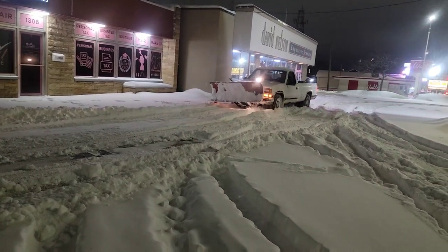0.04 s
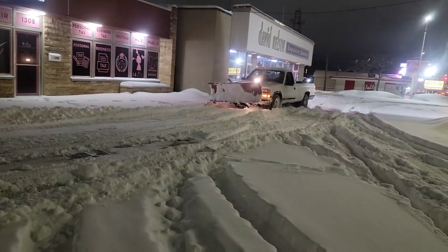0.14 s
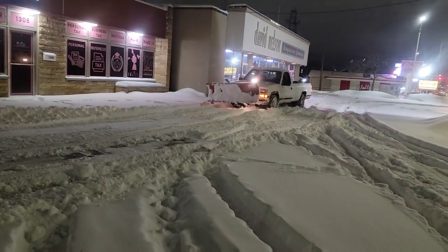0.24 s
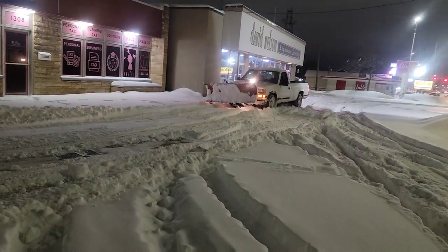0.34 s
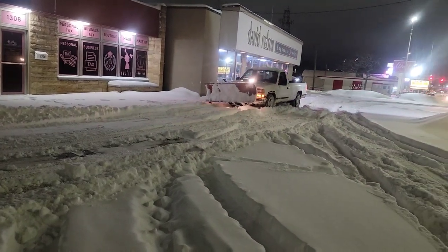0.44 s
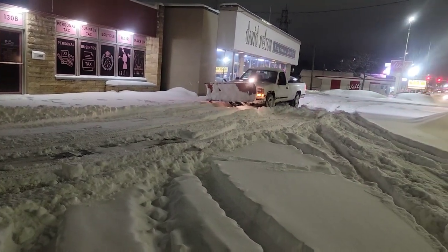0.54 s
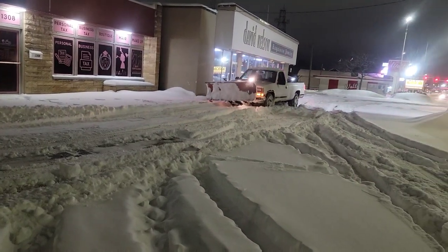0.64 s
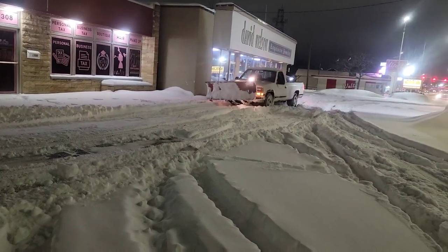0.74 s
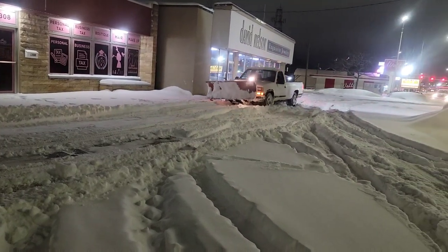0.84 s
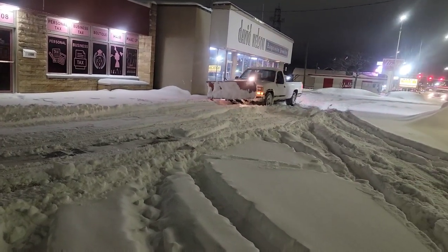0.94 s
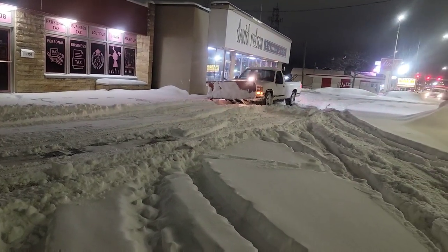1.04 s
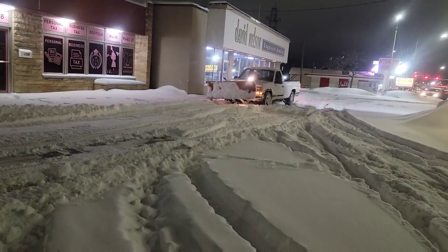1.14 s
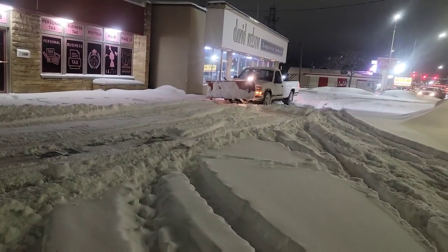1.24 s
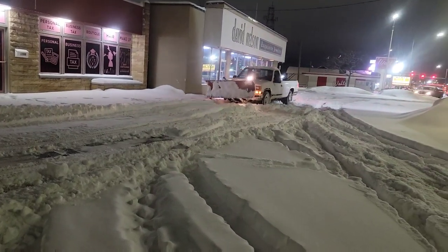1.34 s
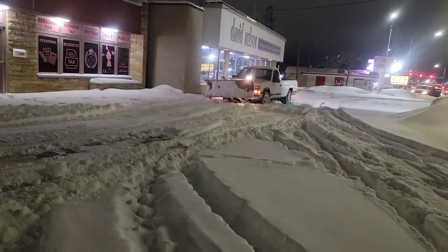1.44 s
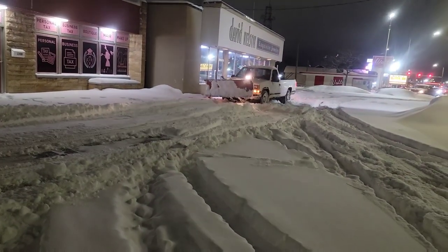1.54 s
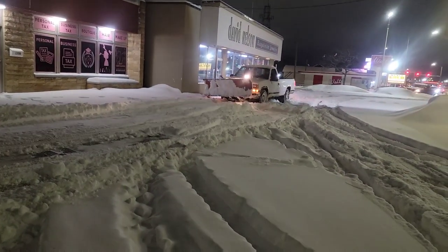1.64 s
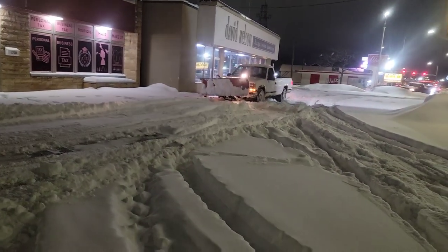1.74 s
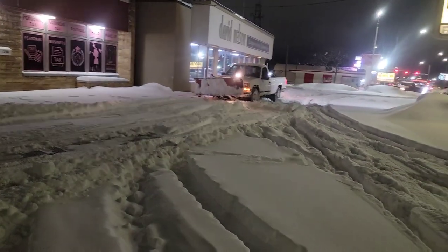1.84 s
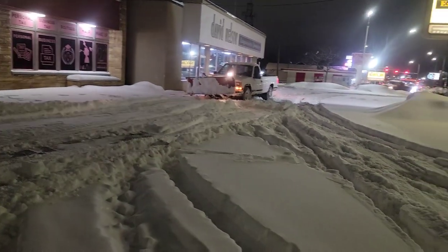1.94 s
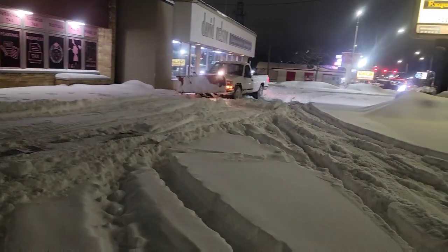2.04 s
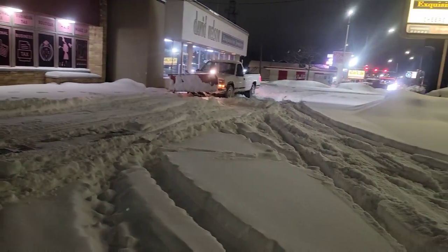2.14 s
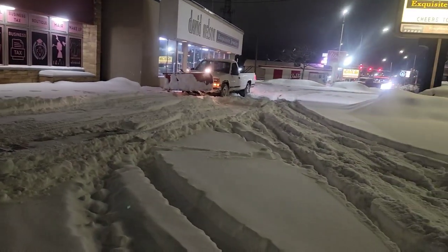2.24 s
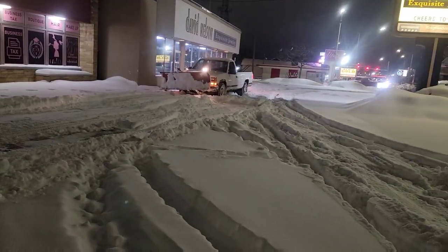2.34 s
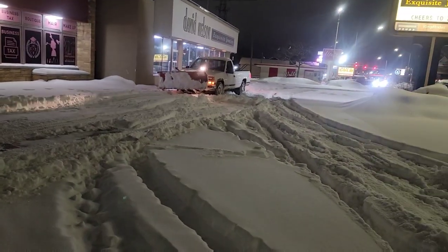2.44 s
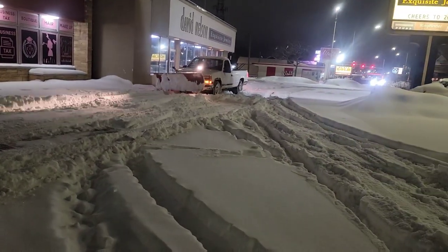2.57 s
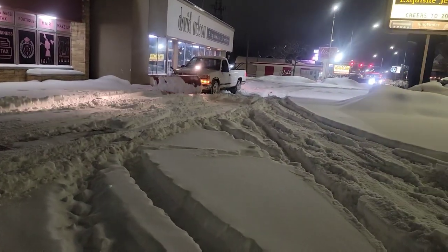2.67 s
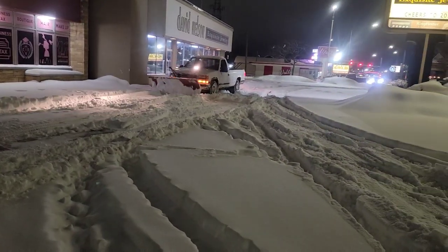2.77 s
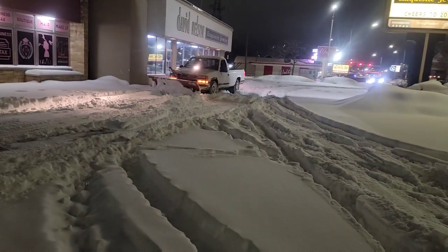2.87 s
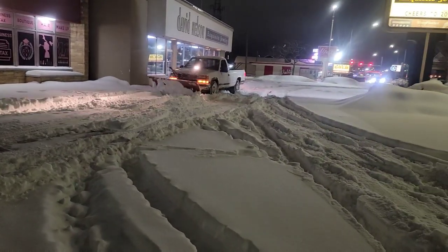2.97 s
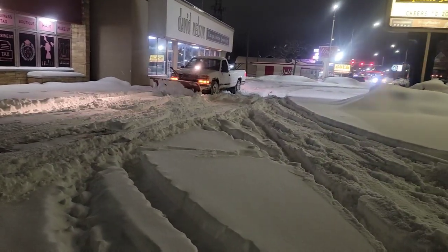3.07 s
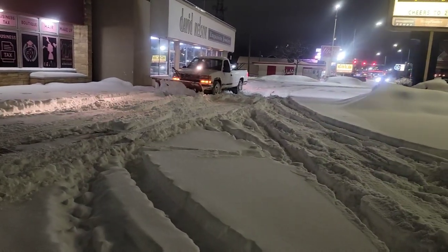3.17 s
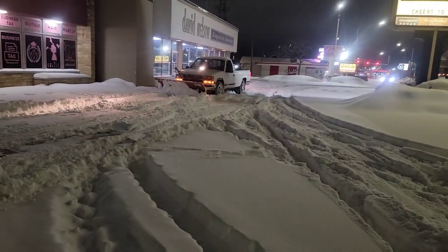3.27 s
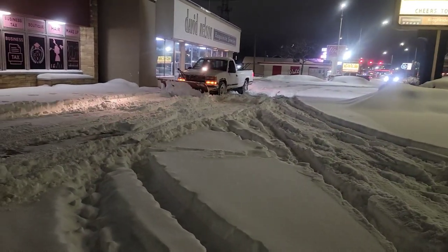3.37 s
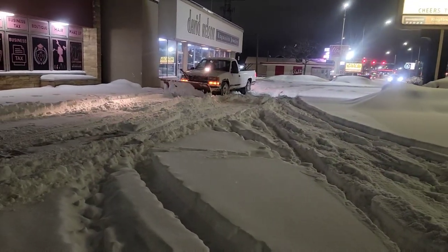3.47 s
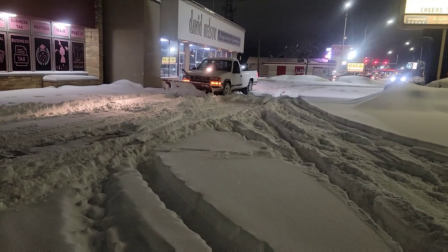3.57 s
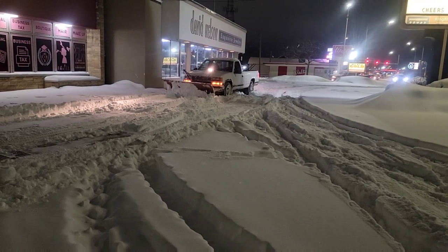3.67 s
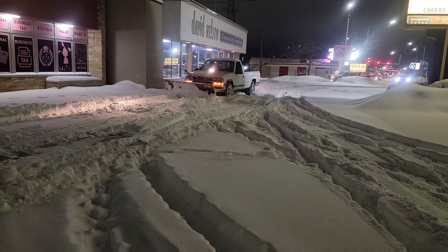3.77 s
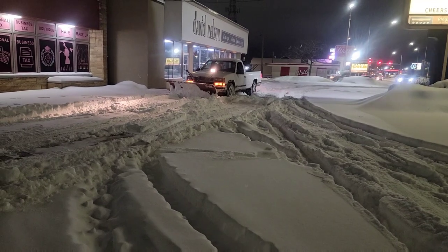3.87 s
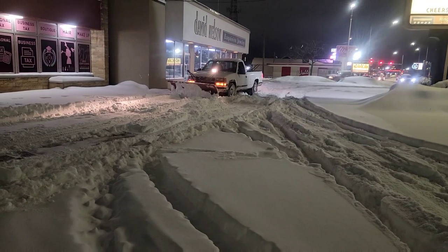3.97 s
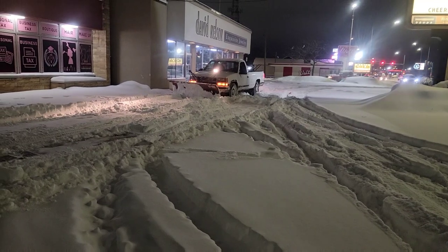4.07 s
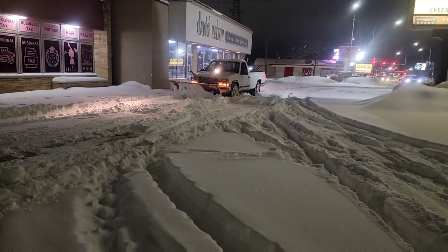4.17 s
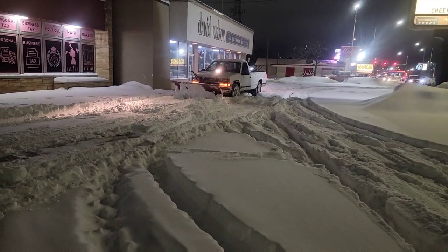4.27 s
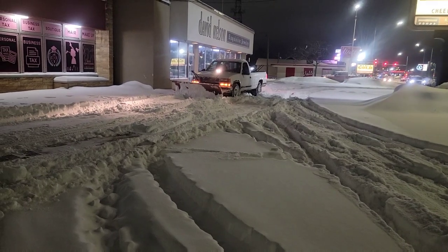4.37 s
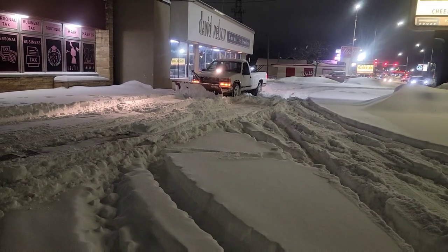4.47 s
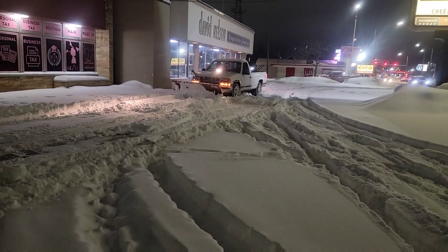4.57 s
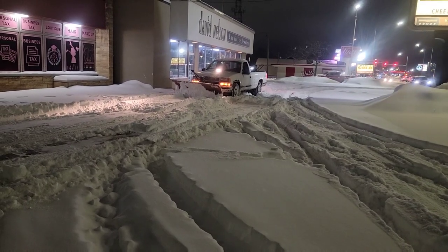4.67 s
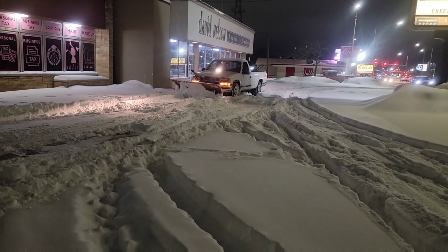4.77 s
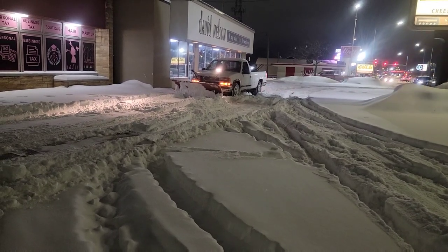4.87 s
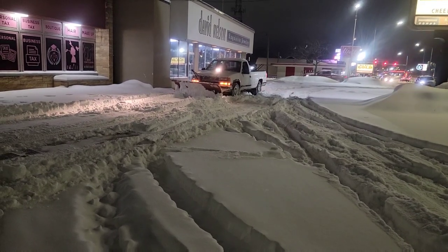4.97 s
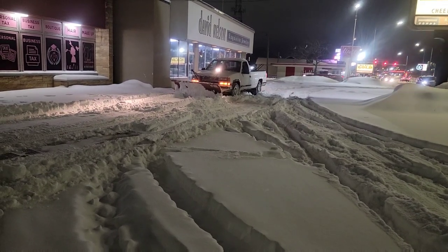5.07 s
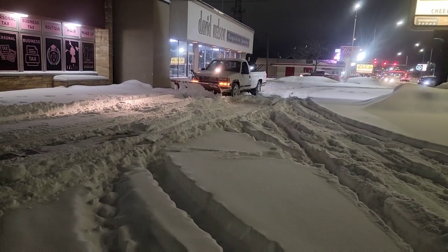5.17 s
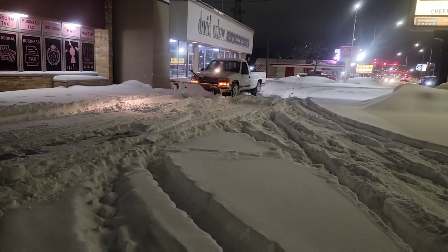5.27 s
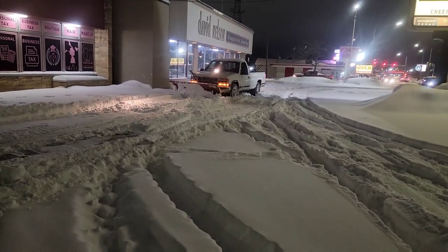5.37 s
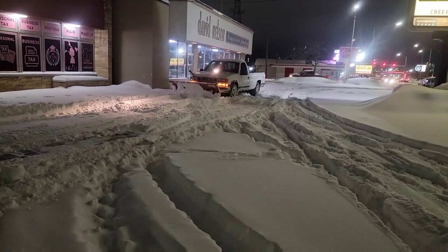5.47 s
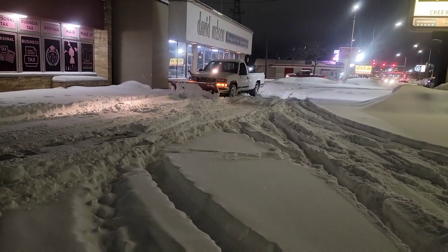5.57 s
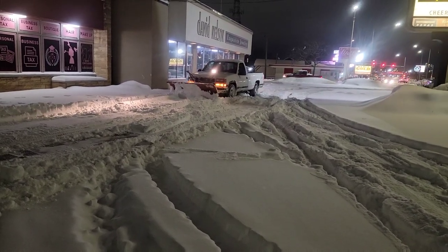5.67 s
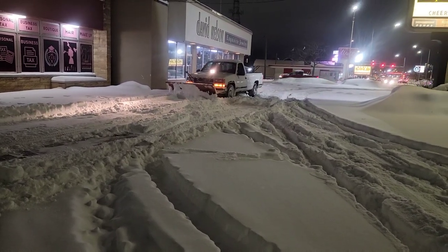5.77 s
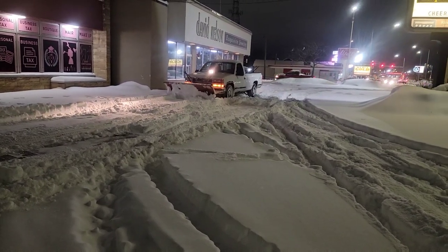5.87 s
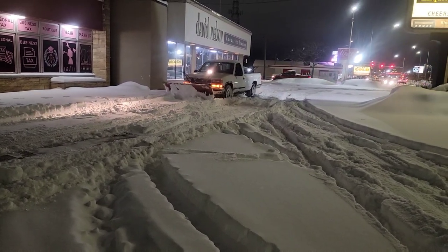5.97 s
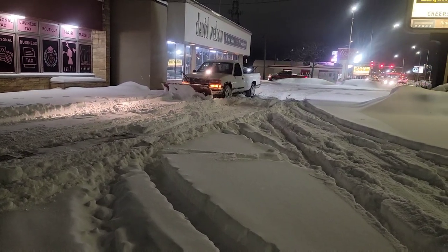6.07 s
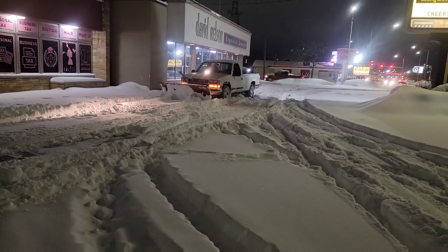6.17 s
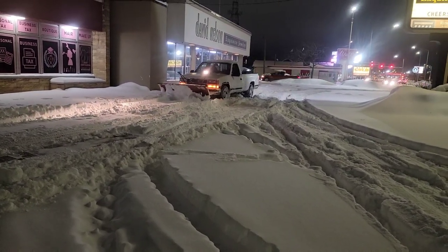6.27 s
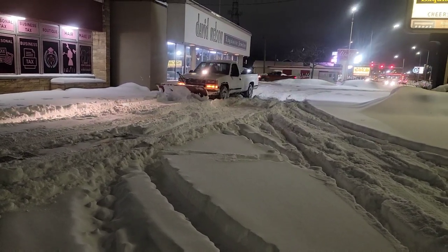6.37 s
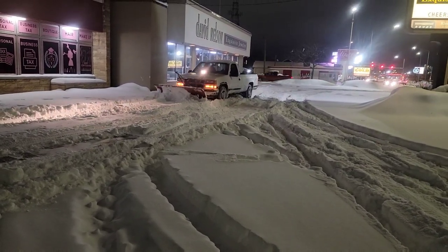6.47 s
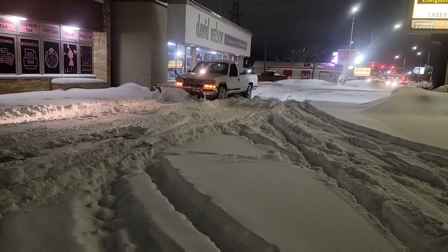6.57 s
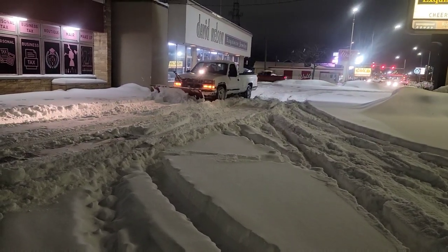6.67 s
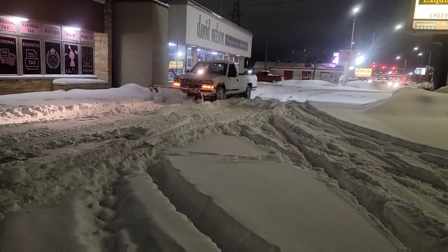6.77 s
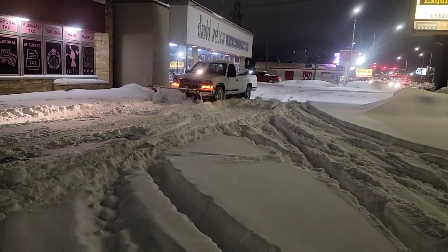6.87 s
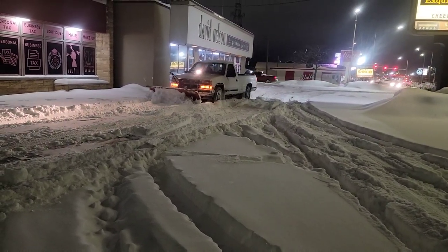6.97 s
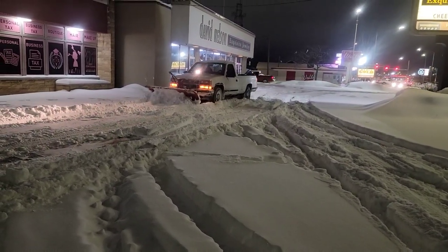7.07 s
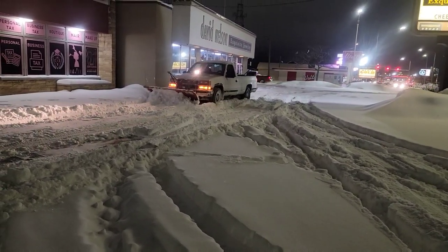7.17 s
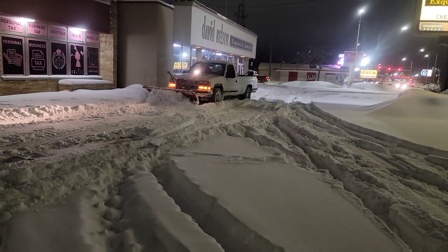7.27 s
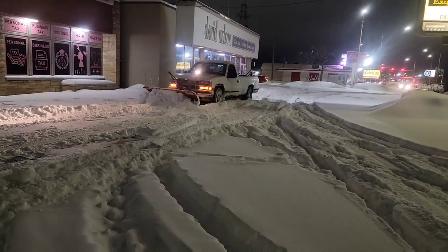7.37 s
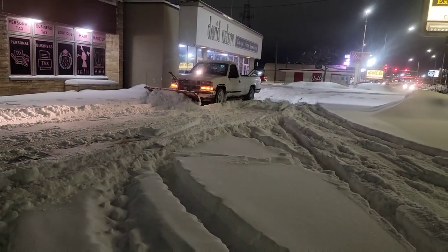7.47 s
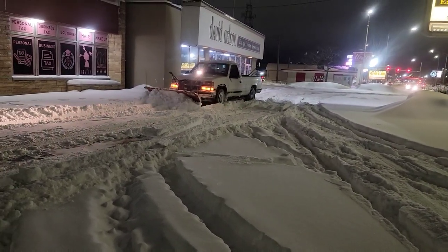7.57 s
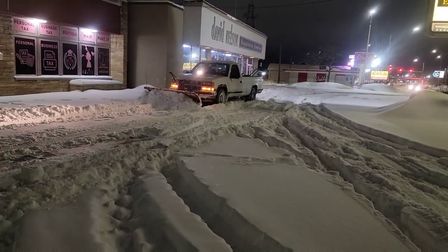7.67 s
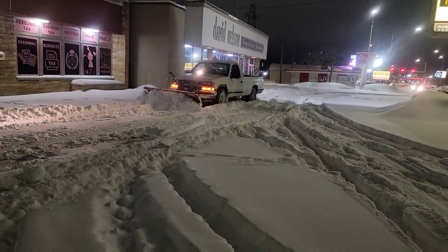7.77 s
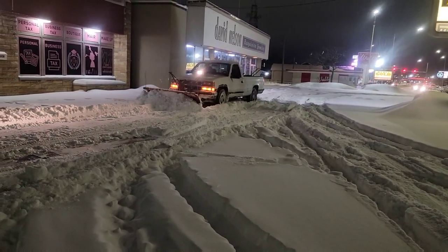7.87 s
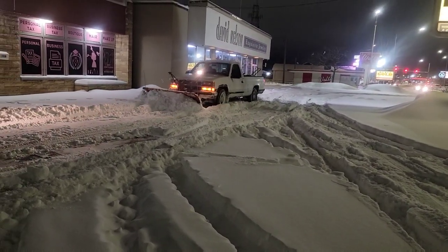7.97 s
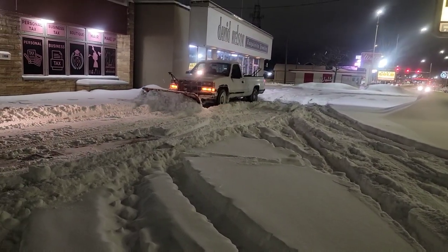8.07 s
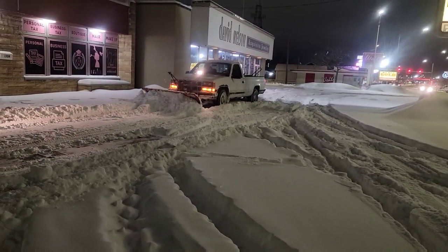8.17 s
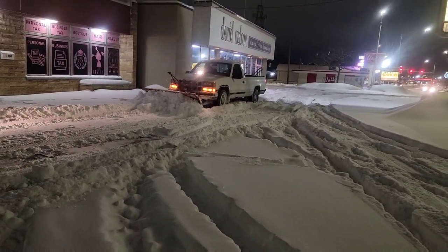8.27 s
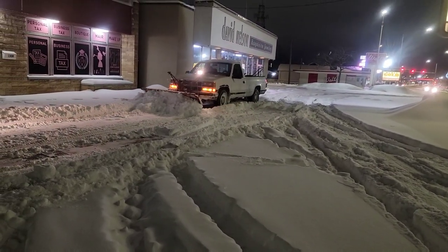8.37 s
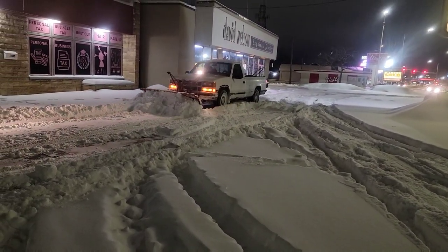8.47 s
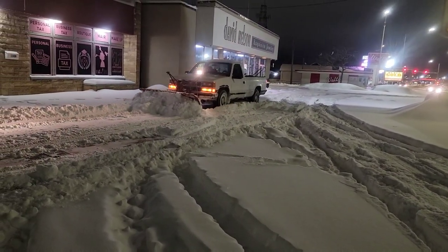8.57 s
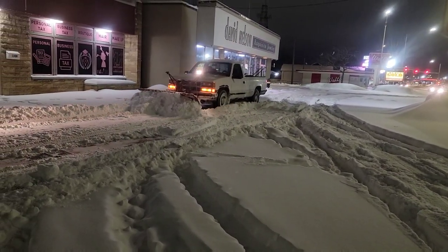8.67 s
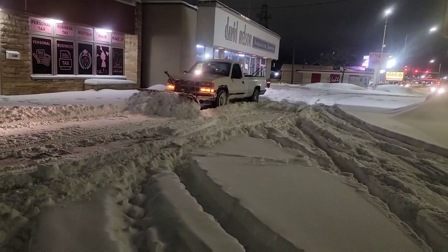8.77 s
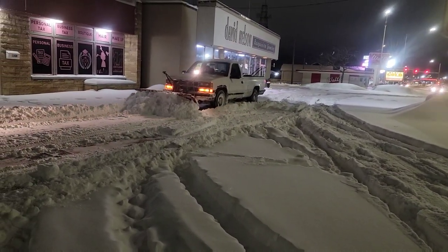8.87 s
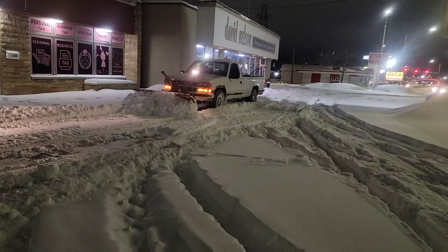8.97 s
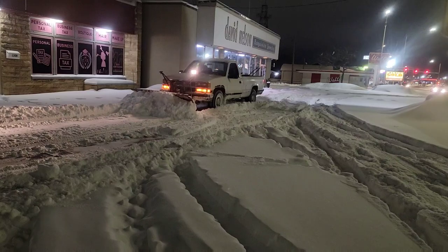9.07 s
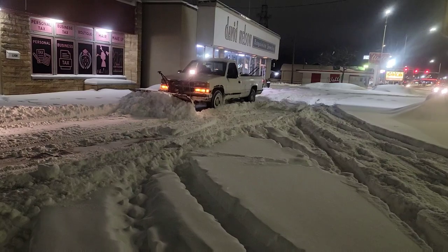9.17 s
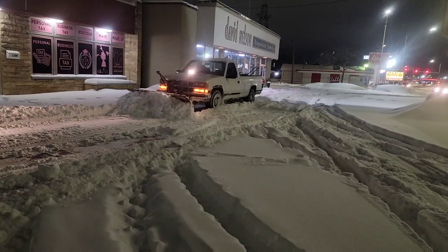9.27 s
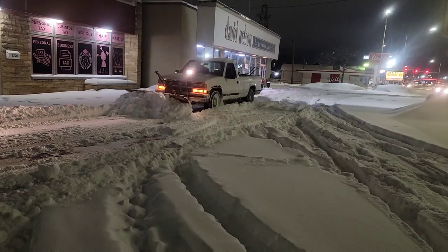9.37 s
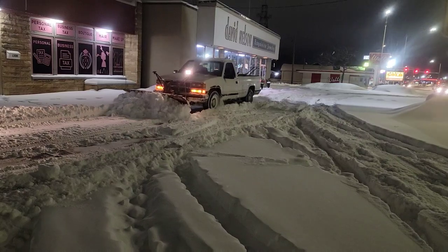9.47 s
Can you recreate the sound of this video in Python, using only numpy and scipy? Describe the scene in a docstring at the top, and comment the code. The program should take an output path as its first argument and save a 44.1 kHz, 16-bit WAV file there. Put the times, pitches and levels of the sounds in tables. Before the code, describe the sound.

Snowy parking lot beside a wet road, heard in wide outdoor stereo. Tyres roar and swish through slush to the right, while a deep truck exhaust burbles down to a quiet idle. A faint machine hum wavers midway. Then the engine pulls, roars and barks closer, dipping between surges, and snow grinds with fine cracks and faint squeaks to the end.

```python
"""A snowy parking lot at night, beside a slushy road: a V8 pickup plows snow.
The engine, built from cycle orders and firing pulses, blips, drops to a lumpy idle, takes up gear and revs.
A broad rush from the idling truck swells and sinks, then the blade scrapes the snow, as shaped noise
and cracks, with squeaks; a faint machine hum wavers. Cars hiss past on the road to the right, as patchy
noise; two close microphone ports hear it all, spread wide."""
import sys
import numpy as np
from scipy import signal
from scipy.fft import rfft, irfft
from scipy.io import wavfile
from scipy.ndimage import uniform_filter1d

SR = 44100
rng = np.random.default_rng(int(sys.argv[2]) if len(sys.argv) > 2 else 0)


def persist_wave(psi):
    """Save psi, clipped to +-1, as 16-bit WAV."""
    counts = np.round(np.clip(psi, -1, 1) * 32767).astype(np.int16)
    wavfile.write(sys.argv[1], SR, np.atleast_2d(counts).T)


N = 420273
TIME = np.arange(N) / SR
BINS = np.fft.rfftfreq(N, 1 / SR)
# short noise frames, 1024 samples long and 256 apart
FRAME_S = np.arange(N // 256 + 5)[:, None] * 256 / SR
FRAME_HZ = np.fft.rfftfreq(1024, 1 / SR)

TRUCK_LAG_MS = -0.13  # lag of the left port; below zero the left port hears the truck first
# working effort and firing rate, at which the engine levels are set
WORK_EFFORT_DB, WORK_HZ = -14, 150

# Strength of each cylinder's pulse at the tailpipe, in firing order; one barks above the rest.
# Each entry: strength in dB.
CYLINDER_DB = [-3, -0.5, -1.5, -3, 2.5, 0, 1, -2]
# Patches of slush under the tyres. Each row: centre in seconds, half length in seconds,
# added roar in dB, added hiss in dB, added spray in dB, swish level in dB.
SLUSH_PATCHES = [(.15, 0.48, 2, -5.5, -2, -39.5), (.75, 0.34, 1, 3, 1.5, -42.5),
                 (2.47, 0.18, 0, 3, -4, -41.5), (3.63, 0.078, -1, -0.5, 3, -60),
                 (5.1, 0.54, -1.5, 3, 2.5, -31.5), (5.53, 0.11, 2.5, 4, -3, -32.5),
                 (6.27, 0.48, -1.5, 1, -0.5, -36), (8.4, 0.41, 0, 4, 5.5, -61)]


def amp(db):
    """Decibels to gain."""
    return 10 ** (np.asarray(db) / 20)


def evened(x):
    """Scales to rms 1."""
    return x / np.sqrt(np.mean(abs(x) ** 2) + 1e-20)


def curve(rows, t=TIME, order=1):
    """One column of a table, joined by straight lines in time."""
    columns = np.transpose(rows)
    return np.interp(t, columns[0], columns[order])


def read(points, hz):
    """A spectrum, joined by straight lines over log frequency."""
    f, value = np.transpose(points)
    return np.interp(np.log(hz + 1), np.log(f + 1), value)


def colour(x, points):
    """Causal filter with the given spectrum, output at rms 1."""
    log_gain = np.log(amp(read(points, abs(np.fft.fftfreq(N, 1 / SR)))))
    # the Hilbert transform gives the phase of the causal (minimum-phase) filter
    response = np.exp(np.conj(signal.hilbert(log_gain)))[:len(BINS)]
    return evened(irfft(rfft(x) * response, N))


def wander(hz):
    """Slow chance of rms 1."""
    return evened(irfft(rfft(rng.standard_normal(N)) / (1 + (BINS / hz) ** 4), N))


def drift(per_s):
    """Random values joined by straight lines."""
    knots_s = np.arange(0, TIME[-1], 1 / per_s)
    return np.interp(TIME, knots_s, rng.standard_normal(len(knots_s)))


def swells(rows, order=2):
    """Sum of bell-shaped rises, one for each row (s, half length s, heights)."""
    return sum(row[order] * np.exp(-abs((TIME - row[0]) / row[1]) ** 2.6) for row in rows)


def bursts(rows, order=2):
    """Level in dB of bell-shaped bursts, one for each row (s, half length s, levels)."""
    gains = [(row[0], row[1], amp(row[order])) for row in rows]
    return 20 * np.log10(swells(gains) + 1e-9)


def band(hz, octaves):
    """A bell over log frequency, 1 at its centre."""
    return np.exp(-(np.log2((FRAME_HZ + 1) / hz) / octaves) ** 2)


def placed(x, lag_ms):
    """A point source reaches the left port later by the lag."""
    left = irfft(rfft(x) * np.exp(-2j * np.pi * BINS * lag_ms / 1000), N)
    return np.array([left, x])


def rush(spectrum, level_db, lag_ms, scattered, patchy_db, shape_db=0):
    """Patchy noise from one bearing, part of it scattered by the walls from all sides."""
    shape = (len(FRAME_S), len(FRAME_HZ))
    direct, common, apart = rng.standard_normal((3, *shape)) + 1j * rng.standard_normal((3, *shape))
    delay = np.exp(-2j * np.pi * FRAME_HZ * lag_ms / 1000)
    # sound from all sides is alike at ports 0.15 m apart only in the bass
    same = np.sinc(2 * FRAME_HZ * .15 / 343)
    diffuse = np.array([common, same * common + np.sqrt(1 - same ** 2) * apart])
    share = np.clip(scattered, .01, .99)
    frames = np.sqrt(1 - share) * np.array([direct * delay, direct]) + np.sqrt(share) * diffuse
    # patches run over some frames and neighbouring frequencies
    patches = uniform_filter1d(rng.standard_normal(shape), size=9, axis=0)
    patches = evened(uniform_filter1d(patches, size=16, axis=1))
    frames = frames * amp(read(spectrum, FRAME_HZ) + shape_db + patchy_db * patches)
    noise = signal.istft(frames, nperseg=1024, noverlap=768, time_axis=-2, freq_axis=-1)[1][:, :N]
    return amp(level_db) * evened(noise)


def grains(per_s, spread_db, decay_s):
    """Sparse tiny cracks of very uneven size, each a decaying puff of noise."""
    sizes = amp(spread_db * np.minimum(rng.exponential(1, N), 5)) * (rng.random(N) < per_s / SR)
    envelope = signal.lfilter([1], [1, -np.exp(-1 / (decay_s * SR))], sizes)
    return envelope * rng.standard_normal(N)


def hum():
    """The first three partials of a wavering machine hum."""
    # Each row: time in seconds, pitch in Hz, level in dB ahead of the partial levels.
    hum_path = [(3.3, 110.1, -63), (4, 112.8, -51), (5.3, 115.9, -55), (5.8, 116.5, -41), (6.4, 115.1, -45),
                (7.3, 112.8, -51)]
    # Each entry: level of a partial in dB, from the first up.
    partial_db = [4, -0.5, -6.5]
    turns = np.cumsum(curve(hum_path) * (1 + .001 * wander(hz=6))) / SR
    tone = sum(amp(db) * np.sin(2 * np.pi * k * turns) for k, db in enumerate(partial_db, 1))
    return placed(np.sqrt(2) * amp(curve(hum_path, order=2)) * tone, lag_ms=0.22)


def road():
    """Passing cars grow and fade with distance: roar, hiss and spray dB, port lag, farness (0-1)."""
    # Each row: time abreast in seconds, tyre roar in dB, wet hiss in dB, fine spray in dB.
    cars = [(.8, -37.5, -40, -51), (5.352, -37.5, -37.5, -50.5), (6.3, -39, -41.5, -53),
            (9.1, -43, -67, -55.5)]
    road_m, car_m_per_s = 14.84, 13.64
    ahead_db = 2.5  # tyres are louder ahead of a car than behind it
    abreast_lag_ms = 0.459  # lag of the left port for a car straight to the right
    abreast_s, *layers_db = np.transpose(cars)[:, :, None]
    ahead_m = car_m_per_s * (abreast_s - TIME)
    distance_m = np.hypot(road_m, ahead_m)
    near = road_m / distance_m
    power = (amp(layers_db) * near * amp(ahead_db * ahead_m / distance_m)) ** 2
    levels_db = [10 * np.log10(layer.sum(0)) + swells(SLUSH_PATCHES, order=2 + k)
                 for k, layer in enumerate(power)]
    # the bearing leans to the car with the strongest spray
    lag_ms = np.average(abreast_lag_ms * near, axis=0, weights=power[-1] ** 2)
    far = 1 - near.max(0)  # of the nearest car
    return *levels_db, np.interp(FRAME_S, TIME, lag_ms), np.interp(FRAME_S, TIME, far)


def traffic():
    """Tyres roar and hiss, swish through slush and fling a spray of drops."""
    # Spectra of tyre roar, wet hiss, thrown slush and fine spray.
    # Each row: frequency in Hz, relative level in dB per Hz.
    roar_spectrum, hiss_spectrum = [(100, -5.5), (200, -2), (330, -0.5), (480, -3), (720, 0.5),
                                    (1050, -1.5), (1500, -7), (2300, -25), (5000, -54)], [(700, -19), (1300, 5), (2000, 0.5), (2700, -1.5),
                                                  (3150, -1.5), (3650, 0.5), (3950, -5), (4700, -9.5),
                                                  (7100, -12), (8200, -43)]
    swish_spectrum, spray_spectrum = [(600, -13.5), (1000, -9), (1500, 1.5), (2000, 3), (2550, 0.5),
                                      (3200, -8.5), (4500, -19), (8000, -26)], [(4000, 3), (7000, 7), (8500, -0.5), (12000, -5),
                                                     (12700, 0), (13400, -7), (15000, -6.5)]
    # One band of the roar stands out, climbing as a car leaves and sinking as the next comes.
    # Each row: time in seconds, centre in Hz, boost in dB.
    tyre_band = [(1.4, 720, -1.5), (2, 940, 7), (2.45, 1170, 5.5), (2.8, 1200, -9), (3.8, 990, 5),
                 (4.5, 680, 2.5)]
    roar_db, hiss_db, spray_db, lag_ms, far = road()
    tyre_db = curve(tyre_band, FRAME_S, order=2) * band(curve(tyre_band, FRAME_S), octaves=.24)
    # the snowy ground swallows the low roar of a distant car
    ground_db = -23.5 * far ** 2 * band(403, octaves=1.05)
    roar = rush(roar_spectrum, roar_db, lag_ms, scattered=0.09, patchy_db=1.1,
                shape_db=tyre_db + ground_db)
    hiss = rush(hiss_spectrum, hiss_db, lag_ms, scattered=0.49, patchy_db=1.5)
    swish_db = bursts(SLUSH_PATCHES, order=5)
    swish = rush(swish_spectrum, swish_db, lag_ms, scattered=0.25, patchy_db=0.7)
    spray = rush(spray_spectrum, spray_db, lag_ms, scattered=0.98, patchy_db=3.0)
    # separate drops at each port
    drops = np.array([colour(grains(per_s=87, spread_db=3.8, decay_s=0.0012), spray_spectrum)
                      for port in range(2)])
    return roar + hiss + swish + spray + amp(spray_db - 7.5) * drops


def plow():
    """Noise and fine cracks carry the idling truck's rush, then the scraping blade; packed snow squeaks."""
    # A broad rush from the idling truck swells and sinks, then the blade scrapes the snow.
    # Each row: time in seconds, level in dB.
    broad_path = [(0, -49), (3.2, -39), (5.3, -52.5), (6.7, -36.5), (9.53, -38.5)]
    # Heaps of snow give way. Each row: centre in seconds, half length in seconds, added scraping in dB.
    shoves = [(7.25, 0.11, 2), (8.0, 0.11, 3), (8.28, 0.22, 4.5), (8.82, 0.15, 5.5), (9.47, 0.3, 5.5)]
    # Packed snow squeaks. Each row: centre in seconds, half length in seconds, level in dB.
    squeaks = [(8.1, 0.22, -43), (9.45, 0.32, -47)]
    # Spectra of the broad noise and the squeak. Each row: frequency in Hz, relative level in dB per Hz.
    broad_spectrum, squeak_spectrum = [(300, -1), (700, 4), (1000, 0), (1400, 0), (2800, -0.5),
                                       (3500, -5.5), (4500, -15), (7100, -24), (8300, -34), (12700, -25),
                                       (15000, -34)], [(900, -29), (1120, -15), (1200, 10), (1290, -18),
                                                       (1600, -45)]
    level_db = curve(broad_path) + swells(shoves)
    broad = rush(broad_spectrum, level_db, TRUCK_LAG_MS, scattered=0.51, patchy_db=1.8)
    cracks = grains(per_s=130, spread_db=-2.5, decay_s=0.0026)
    crackle = amp(level_db - 16.0) * colour(cracks, broad_spectrum)
    squeak = rush(squeak_spectrum, bursts(squeaks), TRUCK_LAG_MS, scattered=0.13, patchy_db=4)
    return broad + squeak + placed(crackle, TRUCK_LAG_MS)


def strain(speed):
    """How hard the engine speeds up (to 1) or slows down (to -1), answered a little late."""
    smooth_s, late_s, full_hz_per_s = 0.11, 0.032, 75
    change = uniform_filter1d(np.gradient(speed) * SR, size=max(1, round(smooth_s * SR)))
    return np.tanh(np.interp(TIME - late_s, TIME, change) / full_hz_per_s)


def drone(cycle, speed, effort_db, idling, pull, overrun):
    """Smooth exhaust orders slide through the tailpipe, which favours some pitches."""
    # Exhaust orders. Each row: multiple of the engine cycle, level in dB against the effort
    # at the working speed, rise in dB per octave of engine speed.
    order_rows = [(2, 6, -6), (4, -14.5, 22), (5, 2.5, 0), (6, -5, 10), (7, -6.5, 6.5), (8, 2, 1.5),
                  (10, -3.5, 17.5), (11, -3.5, 6.5), (12, -8, 15), (13, -1.5, 10.5)]
    # Favour of the tailpipe. Each row: frequency in Hz, gain in dB.
    tailpipe = [(27, -64), (42, -23), (50, -5.5), (55, -4), (62, -1), (70, 0), (80, -8.5), (92, -3),
                (103, -6.5), (118, -6.5), (134, -13), (147, -27), (158, -16), (200, -21.5), (290, -22.5)]
    swell_db, swells_per_s = 3, 5
    throb_db, throb_per_effort, throb_at_rest = -13.5, 1, 0.16
    overrun_drone_db, overrun_throb_db = -5, 7
    crawl_hz, crawl_db = 71, -13.5
    flutter_db = 3
    octaves = np.log2(speed / WORK_HZ)
    # at a crawl with no strain the orders above the firing rate fade
    crawl = (1 - pull ** 2) / (1 + (speed / crawl_hz) ** 8)
    orders = []
    for k, db, rise_db in order_rows:
        level_db = effort_db + db + rise_db * octaves + overrun_drone_db * overrun
        # orders above the firing rate also swell and fade by chance
        upper_db = crawl_db * crawl + swell_db * drift(swells_per_s)
        orders.append((round(k), amp(level_db + upper_db * (k > len(CYLINDER_DB)))))
    # the third order throbs under strain either way
    third_db = throb_db + throb_per_effort * (effort_db - WORK_EFFORT_DB) + overrun_throb_db * overrun
    orders.append((3, amp(third_db) * np.hypot(pull, throb_at_rest)))
    tone = np.zeros(N)
    for k, gain in orders:
        pipe_gain = amp(read(tailpipe, k * speed / len(CYLINDER_DB)))
        # the muffler holds the higher orders back longer, which rounds the beats into a drone
        wave = np.cos(2 * np.pi * k * cycle - np.pi / 2 * k ** 2)
        tone += np.sqrt(2) * gain * pipe_gain * wave
    # at idle the drone flutters
    return tone * amp(flutter_db * idling * (wander(hz=9) - .5))


def rasp(unequal, puffs):
    """Sharp pulse edges and their gas puffs ring through the pipe, at rms 1."""
    # Spectrum of the pipe. Each row: frequency in Hz, relative level in dB per Hz.
    pipe_spectrum = [(120, -50.5), (180, -0.5), (212, 1), (300, -1), (420, -12), (1000, -26.5), (2500, -72)]
    edges = colour(unequal, pipe_spectrum) + amp(-15) * colour(puffs, pipe_spectrum)
    # the shop front throws the edges back a moment later
    return evened(edges + .5 * np.interp(TIME - .017, TIME, edges))


def lope(fired, puffs):
    """Strong and weak burns scatter the boom between the orders, at rms 1."""
    # Spectrum of the boom. Each row: frequency in Hz, relative level in dB per Hz.
    boom_spectrum = [(25, -25), (40, -15), (55, -7.5), (66, 7), (85, -6), (104, -1.5), (135, -18.5),
                     (200, -23.5), (400, -68)]
    burns = evened(fired * rng.standard_normal(N)) + .5 * evened(puffs)
    return colour(burns, boom_spectrum)


def bark(firings):
    """Each firing of the loudest cylinder sets off the same short ring in the pipe, at rms 1."""
    # Spectrum of the bark. Each row: frequency in Hz, relative level in dB per Hz.
    bark_spectrum = [(200, -39), (270, 1), (370, 1), (480, 1.5), (620, -7), (800, -10), (1500, -45)]
    ring_s = 0.024
    ring = rfft(rng.standard_normal(N) * np.exp(-TIME / ring_s))
    # the ring smears the pulse in time and favours no pitch
    return colour(irfft(rfft(firings) * ring / abs(ring), N), bark_spectrum)


def exhaust():
    """Low orders, the sharp edges and bark of the firing pulses, and the lope of uneven burning."""
    # Engine speed: a blip, idle, taking up gear, then three surges.
    # Each row: time in seconds, firings per second in Hz; eight firings make one engine cycle.
    firing_rate = [(0, 53.75), (.1, 66.81), (.24, 86.55), (.36, 90.88), (.62, 69.04), (.8, 62.09),
                   (1.25, 53.43), (1.55, 45.03), (2, 52.56), (4.9, 52.07), (5.2, 46.61), (5.4, 56.82),
                   (5.6, 62.6), (5.9, 61.3), (6.4, 64.87), (6.92, 68.44), (7.06, 85.9), (7.2, 112.8),
                   (7.3, 131.6), (7.5, 148.6), (7.64, 150.9), (7.8, 126.2), (8.05, 154.2), (8.42, 174.9),
                   (8.52, 163.8), (8.62, 145.6), (8.75, 153.1), (8.92, 166.3), (9.2, 162.8), (9.38, 166.1),
                   (9.53, 160)]
    # How hard the engine works. Each row: time in seconds, effort in dB.
    effort = [(0, -16.5), (.1, -11), (.35, -17), (.5, -21), (.76, -20), (1.2, -23), (1.55, -25),
              (1.9, -32.5), (4.4, -37.5), (5.28, -23), (5.44, -15), (5.66, -12), (5.87, -16), (6.8, -19),
              (7.02, -12.5), (7.12, -12), (7.28, -17), (7.6, -17.5), (7.95, -13), (8.37, -13), (8.49, -18),
              (8.7, -13), (9.1, -14.5), (9.3, -13), (9.53, -13)]
    idle_effort_db, hunt_share = -34, 0.025
    # levels at working effort and speed, and how they follow both
    rasp_db, rasp_per_effort, rasp_db_per_octave = -42.5, 0.65, 2.5
    lope_db, lope_per_effort, lope_db_per_octave = -42, 0.39, -9.5
    lope_strain_db, lope_overrun_db = 1.5, 4
    bark_db, bark_db_per_octave = -45, 14
    approach_s, approach_db_per_s = 7.53, 2.5
    speed, effort_db = curve(firing_rate), curve(effort)
    push_db, octaves = effort_db - WORK_EFFORT_DB, np.log2(speed / WORK_HZ)
    idling = np.clip(push_db / (idle_effort_db - WORK_EFFORT_DB), 0, 1) ** 2
    # at idle the engine hunts in speed
    cycle = np.cumsum(speed * (1 + hunt_share * idling * wander(hz=5))) / (8 * SR)
    pull = strain(speed)
    # on the overrun the steady orders drop and the burning turns uneven
    overrun = np.minimum(pull, 0) ** 4 * speed / WORK_HZ
    # one pulse a firing; unequal cylinders give a close stack of lines on the cycle rate
    strength = amp(CYLINDER_DB)
    firing = np.floor(cycle * len(strength)).astype(int)
    fired = np.diff(firing, prepend=0)
    pulses = fired * np.take(strength, firing, mode="wrap") * amp(.5 * rng.standard_normal(N))
    unequal = pulses - fired * strength.mean()
    # each pulse drags a short puff of turbulent gas
    puffs = signal.lfilter([1], [1, -np.exp(-1 / (0.019 * SR))], pulses ** 2) * rng.standard_normal(N)
    loudest = firing % len(strength) == np.argmax(strength)
    # rasp and bark grow as the truck comes closer
    closer_db = approach_db_per_s * np.maximum(TIME - approach_s, 0)
    rasp_level_db = rasp_db + rasp_per_effort * push_db + rasp_db_per_octave * octaves + closer_db
    lope_level_db = (lope_db + lope_per_effort * push_db + lope_db_per_octave * octaves
                     + lope_strain_db * abs(pull) + lope_overrun_db * overrun)
    bark_level_db = bark_db + bark_db_per_octave * octaves + closer_db
    engine = drone(cycle, speed, effort_db, idling, pull, overrun)
    engine += amp(rasp_level_db) * rasp(unequal, puffs)
    engine += amp(lope_level_db) * lope(fired, puffs)
    engine += amp(bark_level_db) * bark(pulses * loudest)
    return placed(engine, TRUCK_LAG_MS)


def scene():
    """Hum, road, broad rush and blade, and engine at the two ports."""
    return hum() + traffic() + plow() + exhaust()


def record(dry):
    """Widens the stereo picture, colours each port and cuts the top."""
    # Stereo widening. Each row: frequency in Hz, boost of the difference between the ports in dB.
    widening = [(60, 17.5), (130, 4), (250, 6.5), (450, 9.5), (1300, 4), (3000, -0.5), (5000, 0)]
    # Balance of the ports. Each row: frequency in Hz, left over right in dB.
    balance = [(60, -.8), (130, -1), (400, -2.5), (1200, -2.5), (2500, -3), (4300, 0), (8000, 3),
               (14000, 3)]
    edge_hz = 15450
    left, right = rfft(dry)
    mid = (left + right) / 2
    side = (left - right) / 2 * amp(read(widening, BINS))
    lean = amp(read(balance, BINS) / 2)
    wide = irfft(np.array([(mid + side) * lean, (mid - side) / lean]), N)
    lowpass = signal.firwin(511, edge_hz, window=("kaiser", 9), fs=SR)
    return signal.oaconvolve(wide, lowpass[None], "same")


dry = scene()
out = record(dry)
persist_wave(out)
```